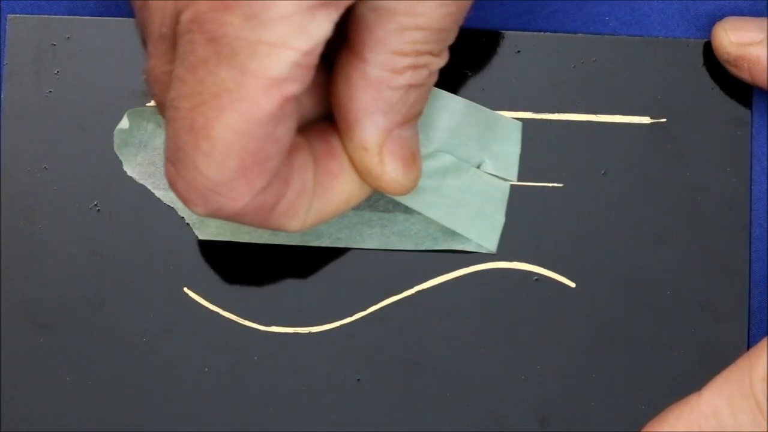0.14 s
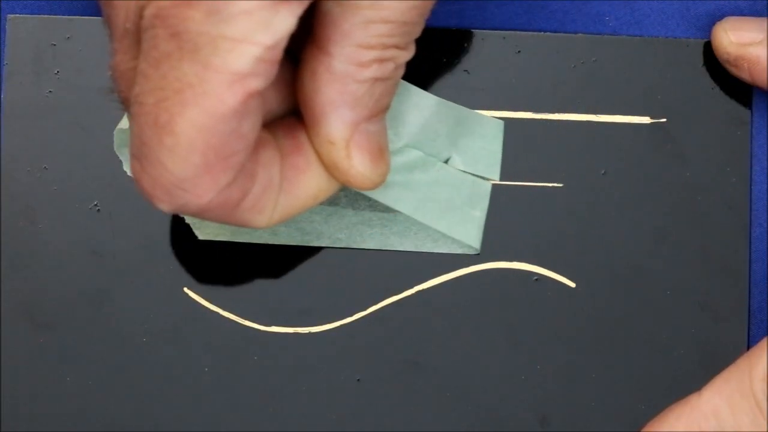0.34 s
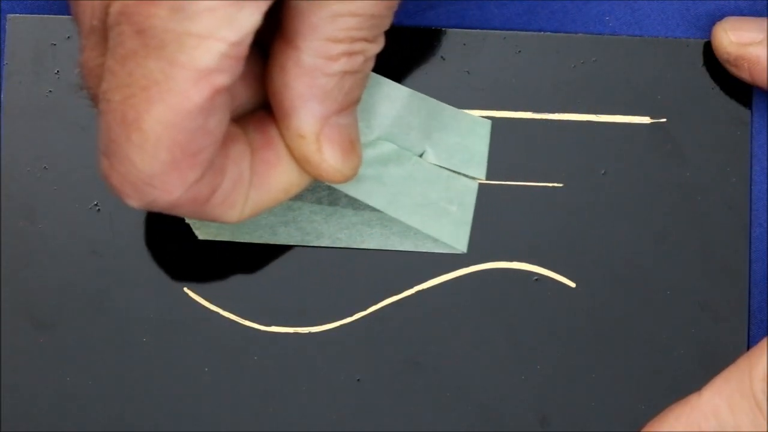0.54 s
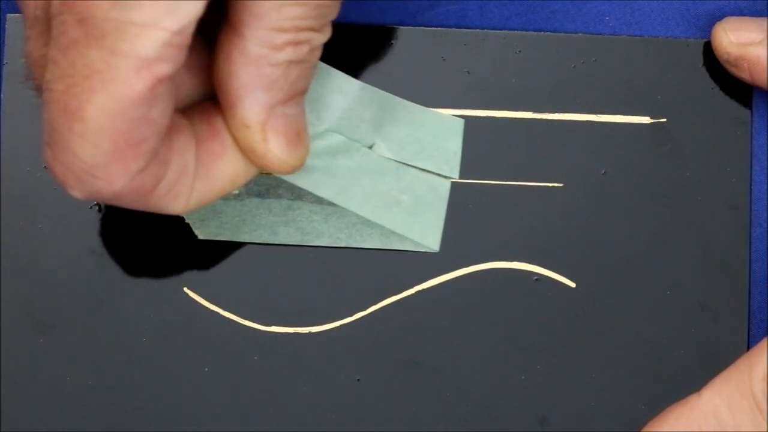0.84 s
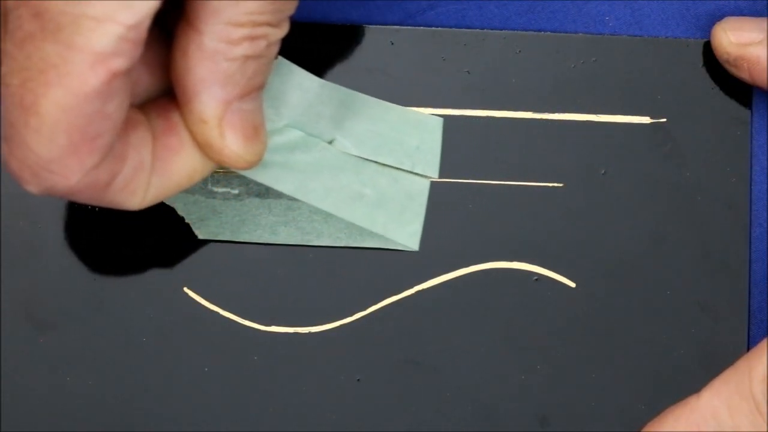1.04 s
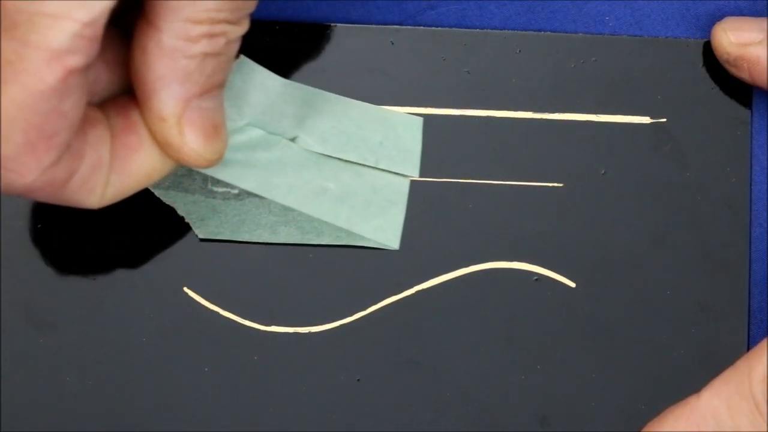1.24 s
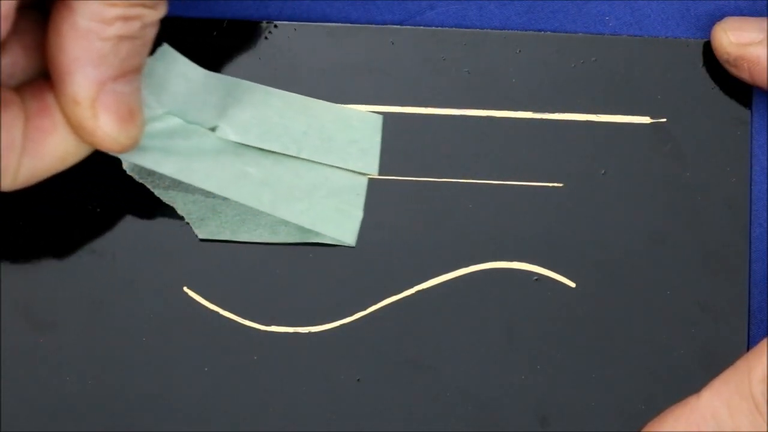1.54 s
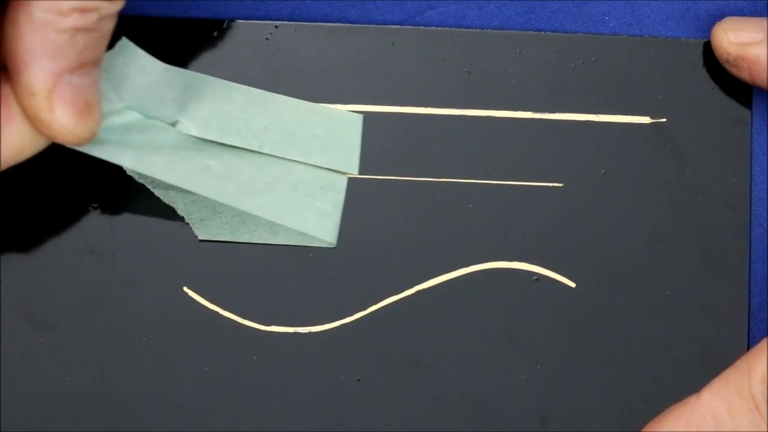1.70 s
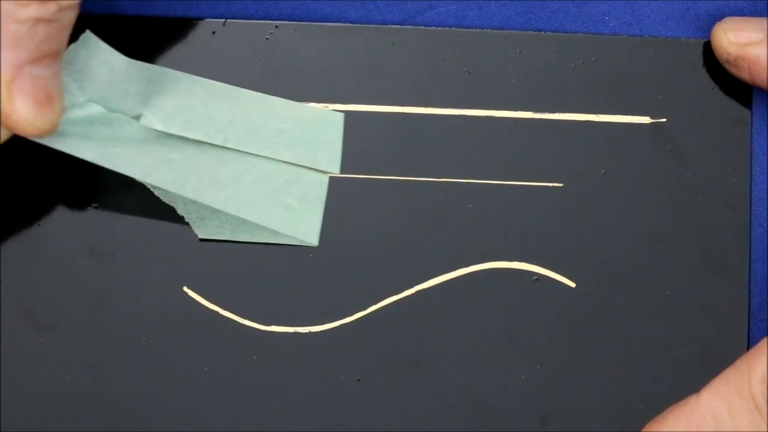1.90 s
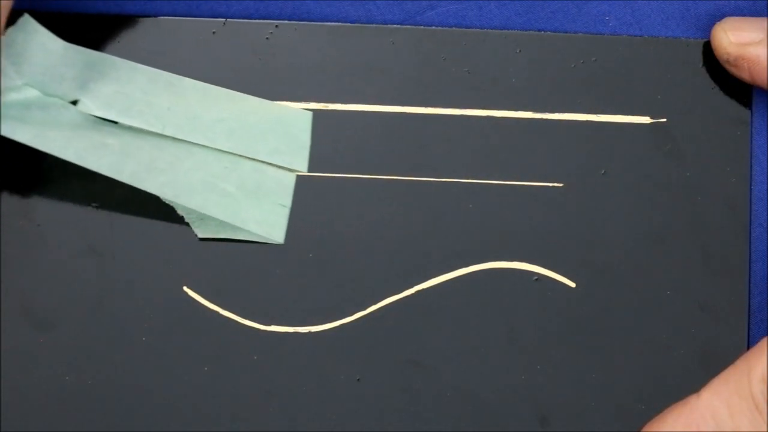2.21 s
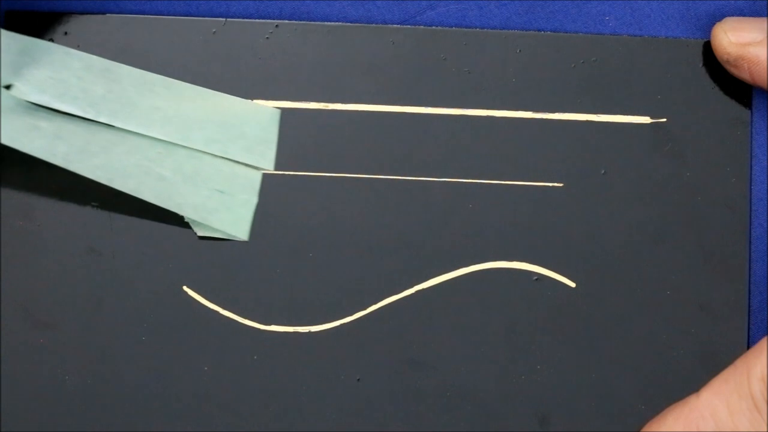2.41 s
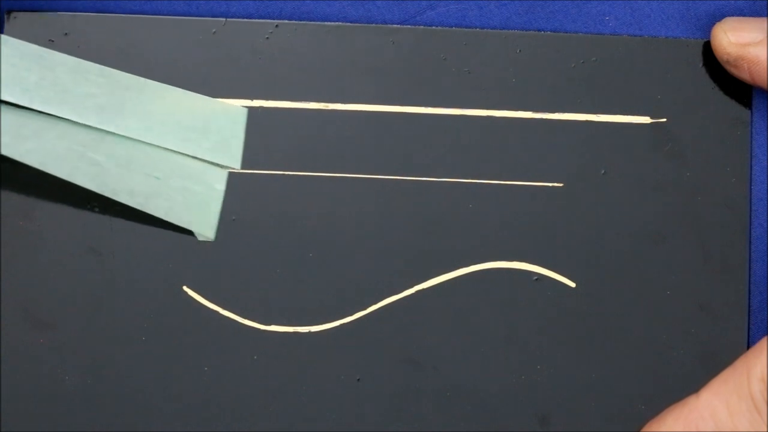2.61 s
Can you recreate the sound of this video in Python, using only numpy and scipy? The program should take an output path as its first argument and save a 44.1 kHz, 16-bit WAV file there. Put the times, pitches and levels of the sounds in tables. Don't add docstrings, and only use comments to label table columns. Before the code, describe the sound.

Paper masking tape peeled slowly off a glossy panel, faint fine crackle broken by sharp loud snaps

```python
import sys
import numpy as np
from scipy import signal
from scipy.io import wavfile

SR = 44100
rng = np.random.default_rng(int(sys.argv[2]) if len(sys.argv) > 2 else 0)


def makeup_ratio(level_db):
    decades = np.asarray(level_db, float) / 20
    return 10 ** decades


def unload_audio(sound):
    columns = np.transpose(np.atleast_2d(sound))
    steps = np.round(np.clip(columns, -1, 1) * 32767)
    wavfile.write(sys.argv[1], SR, steps.astype(np.int16))


N = 121275
LEFT_RIGHT = np.array([[1], [-1]])


def rms_one(x):
    return x / np.sqrt(np.mean(x ** 2) + 1e-20)


def drift(rate):
    r = np.exp(-80 * np.pi * rate / SR)
    slow = signal.lfilter([1], [1, -2 * r, r * r], rng.standard_normal(N // 40 + 2002))
    slow = slow[2000:]
    return np.interp(np.arange(N) / 40, np.arange(len(slow)), rms_one(slow))


def resonate(x, hz, width_hz):
    r = np.exp(-np.pi * width_hz / SR)
    w = 2 * np.pi * min(hz, 19000) / SR
    return signal.lfilter([np.sin(w), 0, -np.sin(w) * r], [1, -2 * r * np.cos(w), r * r], x + 1e-18)


def colour(x, spectrum, patchy_db):
    hz, db = np.transpose(spectrum)
    edges = 22 * 2 ** np.arange(0, 9.9, .5)
    total = 0
    for k, (low, high) in enumerate(zip(edges, edges[1:])):
        band_db = np.interp(np.log(low * high) / 2, np.log(hz), db, left=-60)
        bandpass = signal.butter(2, [low, high], "band", fs=SR, output="sos")
        band = signal.sosfilt(bandpass, x[k % 2])
        total = total + makeup_ratio(band_db + patchy_db * drift(11.0)) * band
    return rms_one(total)


def top_cut(x, hz):
    return signal.sosfilt(signal.cheby2(14, 70, hz * 1.015, fs=SR, output="sos"), x)


# f/Hz, level/dB per Hz
FLOOR = [(25, -10), (45, -10.5), (100, -3), (250, -6), (600, -7.5), (1600, -10.5), (8000, -17),
         (16000, -14.5)]
# f/Hz, level/dB per Hz
FLOOR_SIDE = [(25, -5), (60, -1.5), (300, -1.5), (1100, -6.5), (2200, -10.5), (5800, -7.5), (7000, -7.5),
              (16000, -4)]


def room_floor():
    middle = makeup_ratio(-57.5) * colour(rng.standard_normal((2, N)), FLOOR, patchy_db=1.43)
    side = makeup_ratio(-70) * colour(rng.standard_normal((2, N)), FLOOR_SIDE, patchy_db=1.0)
    return middle + side * LEFT_RIGHT


# f/Hz, level/dB per Hz
CRACKLE_COLOUR = [(500, -16.5), (1200, -7.5), (2500, -5.5), (4000, -0.5), (5600, -2), (7500, -5),
                  (9500, -12), (15500, -17)]


def glue_crackle(sheen):
    grains_per_s, spread_db = 7000, 2.5
    sizes = makeup_ratio(spread_db * np.minimum(rng.exponential(1, (2, N)), 5)) * rng.choice([-1, 1], (2, N))
    breaks = rng.random((2, N)) < grains_per_s * makeup_ratio(1.5 * drift(25)) / SR
    crackle = colour(sizes * breaks + 1e-18, CRACKLE_COLOUR, patchy_db=0.46)
    crackle = crackle + 0.43 * rms_one(resonate(crackle, 5860, 1300))
    treble = signal.butter(2, 7800, "high", fs=SR, output="sos")
    crackle = crackle + sheen * 1.96 * signal.sosfilt(treble, crackle)
    strip_ring = rms_one(resonate(crackle, 8460, 1200))
    return crackle + 0.66 * sheen ** 2 * strip_ring


# f/Hz, width/Hz, level/dB
STRIP_MODES = [(247, 190, -5.5), (389, 107, 0), (622, 215, -3.5), (920, 290, -7)]


def strip_drum():
    drum = 0
    for hz, width_hz, db in STRIP_MODES:
        flicker_db = 2 * drift(13)
        mode = rms_one(resonate(rng.standard_normal(N), hz, width_hz))
        drum = drum + makeup_ratio(db + flicker_db) * mode
    return rms_one(drum)


# t/s, crackle level/dB, strip drumming level/dB, extra sheen of the crackle (0-2)
PULL = [(0, -54, -72, 0.23), (.07, -50.5, -69, 0.3), (.16, -54, -69, 0.11), (.33, -51.5, -64.5, .2),
        (.48, -52.5, -69, 0.18), (.56, -57.5, -70, 0.092), (.74, -53.5, -61, 0.087),
        (.95, -54.5, -58.5, 0.046), (1.18, -56, -63.5, .05), (1.32, -54.5, -59.5, 0.12),
        (1.48, -52, -60, 0.25), (1.58, -58.5, -62, 0.12), (1.72, -61.5, -70, 0.4), (1.95, -61, -72, 0.44),
        (2.12, -56.5, -64.5, 0.53), (2.31, -52.5, -58, 0.68), (2.52, -54, -59.5, 0.68),
        (2.75, -57.5, -71.5, 0.56)]


def peel():
    s, *columns = np.transpose(PULL)
    crackle_db, drum_db, sheen = [np.interp(np.arange(N) / SR, s, column) for column in columns]
    crackle = makeup_ratio(crackle_db - 1.5) * glue_crackle(sheen)
    bench = makeup_ratio(-57.5) * sheen ** 2 * rms_one(resonate(rng.standard_normal(N), 59.7, 150))
    drum = makeup_ratio(drum_db + 0.3) * strip_drum()
    return crackle + drum + bench


# t/s, peak level/dB, f/Hz
TICKS = [(.075, -41, 9000), (.211, -42, 3000), (.655, -37.5, 12500), (.733, -39, 800), (1.2737, -42, 9000),
         (1.280, -35, 2400), (1.2812, -39, 950), (1.4608, -41, 3000), (1.4615, -43, 1200),
         (1.466, -41, 4000), (1.4793, -42, 4200), (1.491, -39, 5000), (1.5087, -39, 6000),
         (1.5133, -37, 4500)]


def ticks():
    out = np.zeros(N)
    for s, db, hz in TICKS:
        drive = makeup_ratio(-60 * np.arange(256) / SR / .006) * rng.standard_normal(256)
        drive[0] = 3
        tick = resonate(drive, hz, hz / 1.8)
        start = int(s * SR)
        out[start:start + 256] += makeup_ratio(db) * tick / np.abs(tick).max()
    return out


SNAP_S = [
    .2302,
    1.5955,
    2.3244,
    2.484,
]
# peak level/dB, second of them after ms, its strength re the first
SNAPS = [(-1.5, 0.4, -4.5), (-4.5, 0.33, -3), (-13.5, .36, 1.95), (-13, 0.97, 1.14)]
# ms after the first, strength re the first
FURTHER_BREAKS = [(1.45, 0.25), (.85, -0.21), (1.24, -0.02), (.4, -0.82)]
# f/Hz, width/Hz, level/dB
SNAP_RINGS = [
    [(610, 660, -16), (1240, 164, -6.5), (1640, 240, -12), (2680, 340, -4.5), (3210, 150, -8.5),
     (3630, 280, -9), (4200, 150, -9), (4960, 380, 0.5), (6240, 850, 0), (7180, 630, -1.5), (8160, 570, -7),
     (10130, 470, -8), (11500, 490, -16.5), (15000, 3300, -17.5)],
    [(715, 81, 3), (1136, 240, -3), (1770, 220, -4), (2850, 300, -8.5), (3560, 140, -9.5),
     (4570, 300, -4.5), (5760, 660, -0.5), (6830, 700, 1), (8530, 570, -4), (9950, 660, -3.5),
     (12500, 1400, -13), (15250, 780, -10)],
    [(550, 390, -14.5), (1190, 270, -1), (1650, 144, 4.5), (1980, 150, -2), (2650, 170, -1.5),
     (3380, 250, -1.5), (4400, 350, 3), (5100, 440, 1), (6000, 870, -1.5), (8900, 730, -5),
     (11100, 850, -7), (13900, 900, -9)],
    [(695, 400, -9), (1050, 210, -2.5), (1600, 190, 1), (2360, 270, -3.5), (3400, 640, -8), (4330, 220, -9),
     (4620, 260, -2.5), (5530, 260, 3.5), (6730, 320, 3), (7960, 420, -1), (8850, 400, -4),
     (10800, 560, -7.5), (12600, 640, -8), (14480, 500, -8)],
]
# f/Hz, level/dB
SNAP_PUSH = [(370, -34), (717, -28.5), (904, -54), (460, -34.5)]
SNAP_THUD_DB = [-35.5, -41, -50, -35.5]
# f/Hz, width/Hz
SNAP_NOTCHES = [
    [(800, 110), (1430, 110), (1850, 120), (3050, 140), (4000, 200), (4500, 180), (5500, 290), (8650, 200),
     (12600, 520)],
    [(930, 250), (2150, 210), (7400, 340), (9100, 670), (14000, 600), (14900, 1300)],
    [(2150, 120), (3900, 350), (12700, 600), (15600, 700)],
    [(1950, 300), (2850, 180), (6250, 180), (8450, 200), (11800, 250), (12350, 250), (15500, 1400)],
]
SNAP_ECHO_DB = [-27, -25, -25, -19]
SNAP_SIDE_DB = [-23, -23, -33, -40]
SNAP_PAN_DB = [0, 0, -1.2, 0]


def fibre_breaks(k, t):
    _, gap_ms, second = SNAPS[k]
    further_ms, further = FURTHER_BREAKS[k]
    strongest = max(1, abs(second))
    rustle = makeup_ratio(-22.5 - 60 * t / 0.014) * resonate(rng.standard_normal(len(t)), 2350, 4700)
    drive = rustle * strongest * (t > .0009)
    drive[0] = -1
    drive[int(gap_ms * SR / 1000)] -= second
    drive[int(further_ms * SR / 1000)] -= further
    ring = 0
    for j, (hz, width_hz, db) in enumerate(SNAP_RINGS[k]):
        gain = (-1) ** j * makeup_ratio(db) * width_hz / np.sin(2 * np.pi * hz / SR)
        ring = ring + gain * resonate(drive, hz, 1.24 * width_hz)
    crack = makeup_ratio(-14) * np.diff(drive, prepend=0) / strongest
    snap = ring / np.abs(ring).max() + crack
    return snap / np.abs(snap).max()


def snap_at_panel(k, t):
    push_hz, push_db = SNAP_PUSH[k]
    push = makeup_ratio(push_db) * np.sin(2 * np.pi * push_hz * t) * makeup_ratio(-60 * t / 0.036)
    turn = 2 * np.pi * 323 * t
    thud = makeup_ratio(SNAP_THUD_DB[k]) * np.e * turn * np.exp(-turn)
    snap = makeup_ratio(SNAPS[k][0]) * fibre_breaks(k, t) - push + thud
    for hz, width_hz in SNAP_NOTCHES[k]:
        snap = signal.lfilter(*signal.iirnotch(hz, hz / width_hz, fs=SR), snap)
    return snap + makeup_ratio(SNAP_ECHO_DB[k]) * np.roll(snap, int(.0088 * SR))


def snaps():
    out = np.zeros((2, N))
    t = np.arange(2048) / SR
    for k, s in enumerate(SNAP_S):
        snap = snap_at_panel(k, t)
        smear = rng.standard_normal(len(t)) * np.exp(-t / 0.00044)
        smear = smear / np.sqrt(np.sum(smear ** 2))
        side = makeup_ratio(SNAP_SIDE_DB[k]) * np.convolve(snap, smear)[:len(t)]
        pan = makeup_ratio(0.5 * LEFT_RIGHT * SNAP_PAN_DB[k])
        start = int(s * SR)
        out[:, start:start + len(t)] += snap * pan + side * LEFT_RIGHT
    return out


# lag/s, level/dB
ECHOES = [(.0095, -54), (.0172, -50), (.0235, -28.5)]


def workshop(x):
    t = np.arange(SR // 2) / SR
    tail = rms_one(resonate(rng.standard_normal(len(t)), 5600, 2800)) + 1.1 * rng.standard_normal(len(t))
    build_up = np.clip((t - .004) / 0.039, 0, 1)
    reply = makeup_ratio(-40 - 60 * t / 0.25) * tail * build_up / 3.8
    for k, (lag_s, db) in enumerate(ECHOES):
        smear_s = 0.0017 * (k + 0.24)
        smear = rng.standard_normal(200) * np.exp(-t[:200] / smear_s)
        start = int(lag_s * SR)
        reply[start:start + 200] += makeup_ratio(db) * smear / np.sqrt(np.sum(smear ** 2))
    return signal.fftconvolve(x, reply)[:N]


def scene():
    hits = snaps()
    floor = room_floor()
    bed = workshop(hits.mean(axis=0)) + peel() + ticks() + floor
    return hits + top_cut(bed, 15980)


def band_limit(x):
    return signal.sosfilt(signal.butter(12, 17140, fs=SR, output="sos"), x)


def record(dry):
    mix = top_cut(dry, 16850)
    return band_limit(mix)


dry = scene()
out = record(dry)
unload_audio(out)
```